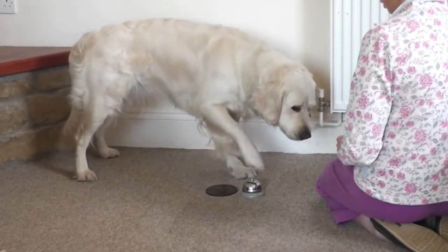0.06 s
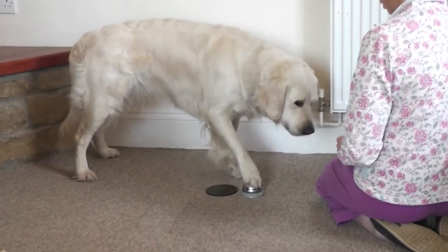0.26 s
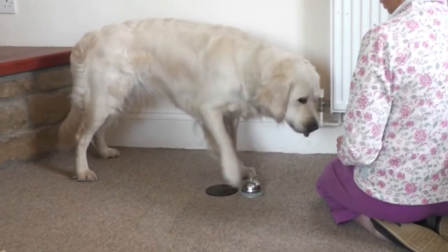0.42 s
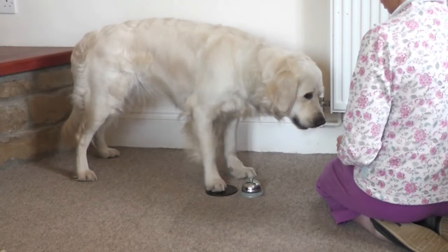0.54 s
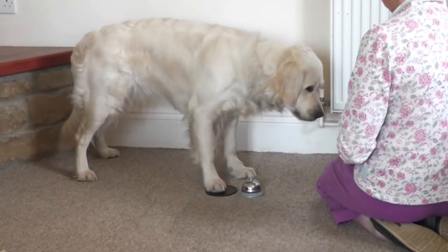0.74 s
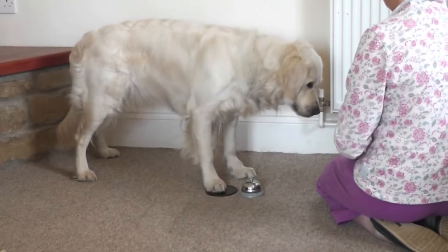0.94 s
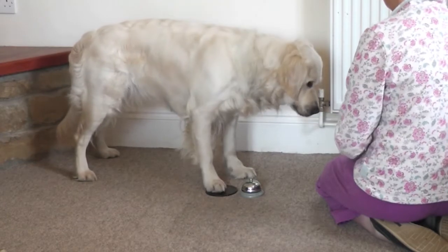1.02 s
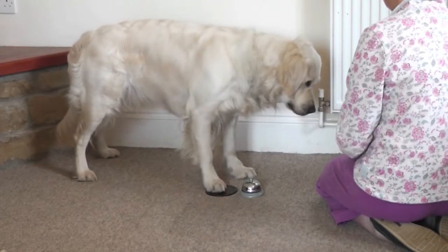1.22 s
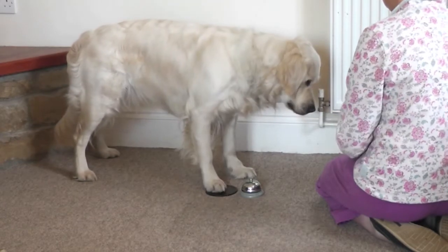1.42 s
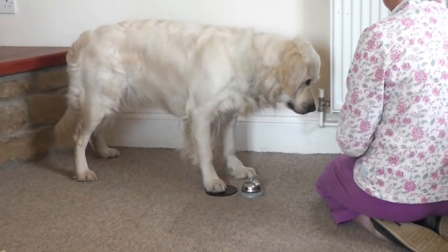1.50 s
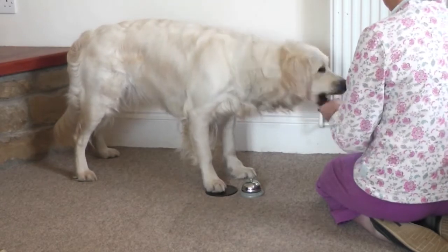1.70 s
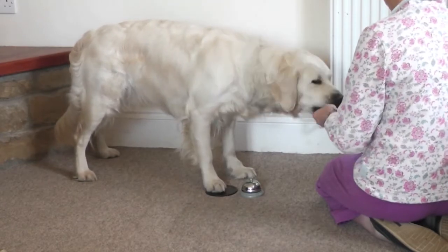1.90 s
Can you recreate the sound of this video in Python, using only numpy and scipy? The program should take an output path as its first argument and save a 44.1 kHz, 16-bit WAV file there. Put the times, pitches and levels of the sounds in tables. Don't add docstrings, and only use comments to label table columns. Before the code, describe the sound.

A small metal desk bell is dinged once by a dog's paw, then a hand clicker snaps twice

```python
import sys
import numpy as np
from scipy import signal
from scipy.io import wavfile
from scipy.ndimage import uniform_filter1d

SR = 44100
rng = np.random.default_rng(int(sys.argv[2]) if len(sys.argv) > 2 else 0)


def waveform_to_disk(signal):
    frames = np.transpose(np.atleast_2d(signal))
    scaled = np.clip(frames, -1, 1) * 32767
    samples = np.round(scaled).astype(np.int16)
    wavfile.write(sys.argv[1], SR, samples)


def to_linear_factor(level_db):
    exponent = np.asarray(level_db, float) / 20
    return 10 ** exponent


N = 85995

# pitch_hz, density_db (per Hz)
HOUSE_SPECTRUM = [(30, -12), (110, -8.5), (300, -19.5), (700, -15.5), (1500, -22), (2800, -52),
                  (4200, -33.5), (8000, -38.5), (15000, -45)]
# time_s, pitch_hz, level_db
WHINE_PATH = [
    (.04, 600, -69),
    (.1, 578, -68.5),
    (0.201, 564, -59.5),
    (.24, 555, -93),
    (0.929, 665, -80),
    (1.019, 660, -59),
    (1.199, 640, -73),
    (1.451, 600, -70.5),
    (1.632, 560, -59.5),
    (1.72, 545, -67.5),
]
# pitch_hz, t60_s, level_db
ROOM_BANDS = [(400, 0.17, -16), (1560, 0.49, 4), (4630, 0.36, 8.5), (9000, 0.29, -27), (13900, 0.17, 14.5)]
# start_s, level_db, pitch_hz, width_hz, length_s
SMALL_NOISES = [
    (0.137, -47.5, 4450, 900, 0.001),
    (.141, -53.5, 4300, 1211, 0.001),
    (0.038, -54, 1099, 499, 0.0073),
    (0.907, -61, 1280, 248, 0.071),
    (.91, -57, 487, 120, 0.034),
    (1.615, -60, 960, 900, 0.026),
    (1.623, -55, 660, 202, 0.0368),
    (1.766, -64, 10600, 4000, .008),
    (1.769, -64.5, 3860, 910, 0.032),
]
# start_s, level_db, thud_db
CLICKER_SNAPS = [
    (.4755, -4.5, -20),
    (.6865, -4, -21.5),
]
# pitch_hz, width_hz, in_db, out_db
TONGUE_MODES = [(1890, 585, -13.5, -16), (4873, 920, -5.5, -4), (6384, 730, -5.5, -2), (7305, 980, 0.5, -5),
                (8995, 1420, -2.5, -5.5), (10560, 766, -15.5, -4.5), (11100, 800, -6, -3),
                (13820, 960, -13.5, -11.5)]
# pitch_hz, t60_s, level_db
TONGUE_AFTER_RING = (9600, 0.35, -36.5)
# start_s, crack_db, thud_db
PAW_KNOCKS = [
    (0.2286, -21.5, -40.5),
    (0.231, -18.5, -19.5),
]
DOME_PITCHES = [900.0, 889.9, 2369.8, 2355.9, 4369.9, 4365.3, 6855.3, 6870.7, 9814.2, 9804.9, 13181,
                13169.5]
# level_db, t60_s, left_over_right_db, leg_near_change_db
DOME_MODES = [(-34, 8.73, 2, 3), (-47.5, 9.5, 1.9, 0), (-33, 4.43, 5, -5.5), (-43, 4.4, -2, -1),
              (-30, 4.37, -0.2, 0.9), (-42.5, 4.2, -15, 1.9), (-22.5, 1.924, -0.3, -0.9),
              (-33, 1.81, -17.5, 0), (-18.5, 0.47, -8, 2.7), (-32.5, 0.41, -23.5, 0.5), (-23, 0.37, 2, 3.7),
              (-22, 0.24, -11.5, 1.1)]
DOME_PHASES = [0, .06, 0, .15, 0, -.14, 0, -.08, 0, .24, 0, .13]
PORT_LAGS = [0.057, 0.0087, 0.051, 0.048, 0.012, -.13, -.07, .02, -0.0082, 0.13, 0.26, -0.085]
BASE_PITCHES = [3720, 6836, 8178, 11402, 11451]
# level_db, t60_s, left_over_right_db
BASE_MODES = [(-37.5, .2, -4.5), (-29, 0.16, -4), (-21.5, 0.23, -0.8), (-21.5, 0.24, -4.5),
              (-17, .13, -6.5)]
# start_s, gain_reached_db
GAIN_DUCKS = [
    (.233, -10.5),
    (.477, -6.5),
    (.688, -7.5),
]

HOUSE_DB, HUM_HZ, HUM_DB = -56.5, 114.6, -62.5
SCUFF_DB, SCUFF_END_S = -63, 0.33
ROOM_DB, KNOCK_ROOM_DB = 0.5, -3
FLUTTER_S, FLUTTER_DB = 0.012, 0.5
SNAP_S, BUCKLES = 0.007, 7
PLUNGER_S, STRIKE_S = 0.2285, 0.2315
LEG_AWAY_S, LEG_MOVE_S = 0.72, 0.13
PLUNGER_RING_DB = -16
OLD_RING_DB, OLD_RING_TILT_DB = -28.5, -9.5
OVERTONE_DB, OVERTONE_NEAR_DB = 19.5, -6
RATTLE_DB, RATTLE_S = -30, 0.051
NOTCH_HZ, NOTCH_WIDTH_HZ, NOTCH_DB = 3030, 1800, -15
DUCK_ATTACK_S, RECOVER_DB_S = 0.0012, 44.5
CEILING, TOP_HZ = 0.4, 16100


def band(x, hz, width):
    return signal.lfilter(*signal.iirpeak(min(hz, 0.45 * SR), hz / width, SR), x)


def unit(x):
    return x / np.sqrt(np.mean(x ** 2))


def pan(x, db):
    return x * to_linear_factor(np.array([[db / 2], [-db / 2]]))


def walk(rate):
    k = int(SR / rate)
    return unit(uniform_filter1d(uniform_filter1d(rng.standard_normal(N), k), k))


def decay(t, start, length):
    return (t >= start) * np.exp(-np.maximum(t - start, 0) / length)


def house(t):
    spectrum_hz, spectrum_db = np.array(HOUSE_SPECTRUM).T
    tone = 0
    for hz in 30 * 2 ** np.arange(0, 9.1, 0.5):
        mid, side = (unit(band(band(rng.standard_normal(N), hz, hz / 2.2), hz, hz / 2.2)) for _ in range(2))
        db = np.interp(np.log(hz), np.log(spectrum_hz), spectrum_db) + 10 * np.log10(hz) + 2.23 * walk(4)
        stereo = mid + np.clip(hz / 170, 0.4, 1) * side * np.array([[1], [-1]])
        tone = tone + to_linear_factor(db) * stereo * pan(1, np.clip(600 / hz - 1.5, 0, 2.5))
    hum = to_linear_factor(HUM_DB + 2.2 * walk(25)) * np.sin(2 * np.pi * HUM_HZ * t)
    brush = unit(band(rng.standard_normal((2, N)), 630, 899.4))
    scuff = brush * to_linear_factor(SCUFF_DB + 1.3 * walk(30)) * (t < SCUFF_END_S)
    return unit(tone) * to_linear_factor(HOUSE_DB) + pan(hum, 2.0) + scuff


def whine(t):
    s, hz, db = np.array(WHINE_PATH).T
    pitch = np.interp(t, s, hz) * (1 + 0.0051 * walk(24))
    level = to_linear_factor(np.interp(t, s, db, -120, -120) + 2.5 * walk(5))
    return level * np.sin(2 * np.pi * np.cumsum(pitch) / SR)


def room(x):
    t = np.arange(SR // 2) / SR
    common, own = rng.standard_normal(len(t)), rng.standard_normal((2, len(t)))
    flutter = to_linear_factor(FLUTTER_DB * np.cos(2 * np.pi * t / FLUTTER_S))
    grain = (0.8 * common + 0.6 * own) * flutter * np.clip(t / 0.0024, 0, 1)
    tail = sum(to_linear_factor(db - 60 * t / t60) * band(grain, hz, 1.16 * hz) for hz, t60, db in ROOM_BANDS)
    tail = tail / np.sqrt(np.sum(tail ** 2) / 2)
    return signal.fftconvolve(x[None], tail, axes=1)[:, :N]


def ticks(t):
    out = 0
    for s, db, hz, width, length in SMALL_NOISES:
        puff = unit(band(band(rng.standard_normal(N), hz, width), hz, width))
        out = out + to_linear_factor(db) * puff * decay(t, s, length)
    return out


def thud(t, s, db):
    return to_linear_factor(db) * decay(t, s, 0.00076) * np.sin(2 * np.pi * 420 * (t - s))


def clicker(t):
    out = 0
    for j, (s, db, thud_db) in enumerate(CLICKER_SNAPS):
        when = (np.arange(BUCKLES) + 0.7 * rng.random(BUCKLES)) / BUCKLES
        swell = 0.39 + 0.77 * np.sin(np.pi * when)
        size = swell * to_linear_factor(1.3 * rng.standard_normal(BUCKLES)) * rng.choice([-1, 1], BUCKLES)
        steps = np.zeros(N)
        steps[((s + SNAP_S * when) * SR).astype(int)] = size
        steps = steps + 0.097 * rng.standard_normal(N) * decay(t, s, SNAP_S)
        ring = 0
        for k, (hz, width, *in_out_db) in enumerate(TONGUE_MODES):
            mode = band(band(steps, hz, width), hz, 2 * width) * SR / width / 8
            ring = ring + (-1) ** k * to_linear_factor(in_out_db[j]) * mode
        out = out + to_linear_factor(db) * ring + thud(t, s + SNAP_S / 2, thud_db)
    hz, t60, db = TONGUE_AFTER_RING
    after = unit(band(rng.standard_normal(N), hz, 150))
    return out + to_linear_factor(db) * after * decay(t, CLICKER_SNAPS[-1][0], t60 / np.log(1000))


def knocks(t):
    noise = rng.standard_normal(N)
    bright = band(noise, 11000, 7400) + 0.53 * band(noise, 3000, 3000) + 0.5 * band(noise, 1400, 1200)
    out = 0
    for s, crack_db, thud_db in PAW_KNOCKS:
        out = out + to_linear_factor(crack_db) * bright * decay(t, s, 0.003) + thud(t, s, thud_db)
    return out


def bell(t):
    near = np.clip((LEG_AWAY_S - t) / LEG_MOVE_S + 0.5, 0, 1)
    age = np.maximum(t - STRIKE_S, 0)
    onset = np.where(t >= STRIKE_S, 1, to_linear_factor(PLUNGER_RING_DB) * decay(t, PLUNGER_S, 0.0023))
    out = 0
    modes = zip(DOME_PITCHES, DOME_PHASES, PORT_LAGS, DOME_MODES)
    for k, (hz, turns, lag, (db, t60, lr_db, near_db)) in enumerate(modes):
        old = (k < 6) * (t < STRIKE_S) * to_linear_factor(OLD_RING_DB + OLD_RING_TILT_DB * (k // 2))
        env = to_linear_factor(db) * (onset * to_linear_factor(-60 * age / t60 + near_db * near) + old)
        cycles = hz * (t - STRIKE_S) + turns + np.array([[lag / 2], [-lag / 2]])
        out = out + pan(env * np.sin(2 * np.pi * cycles), lr_db)
        if k == 1:
            octave = band(out ** 2, 2 * DOME_PITCHES[0], 100)
            out = out + to_linear_factor(OVERTONE_DB + OVERTONE_NEAR_DB * near) * octave
    for hz, (db, t60, lr_db) in zip(BASE_PITCHES, BASE_MODES):
        mode = onset * to_linear_factor(db - 60 * age / t60) * np.cos(2 * np.pi * hz * (t - STRIKE_S))
        out = out - pan(mode, lr_db)
    noise = rng.standard_normal((2, N)) + 0.47 * rng.standard_normal(N)
    rattle = unit(band(noise, 1327, 1400))
    return out + to_linear_factor(RATTLE_DB) * rattle * decay(t, STRIKE_S, RATTLE_S)


def scene():
    t = np.arange(N) / SR
    paw = knocks(t)
    rest = clicker(t) + ticks(t)
    echo = room(rest + to_linear_factor(KNOCK_ROOM_DB) * paw)
    return bell(t) + pan(paw + rest, -0.6) + to_linear_factor(ROOM_DB) * echo + whine(t) + house(t)


def low_pass(x):
    return signal.sosfilt(signal.butter(12, 17100, fs=SR, output="sos"), x)


def record(dry):
    t = np.arange(N) / SR
    ducks = []
    for s, reached_db in GAIN_DUCKS:
        recovery = np.minimum(reached_db + RECOVER_DB_S * (t - s), 0)
        ducks.append(recovery * np.clip((t - s) / DUCK_ATTACK_S + 0.5, 0, 1))
    gain = to_linear_factor(np.min(ducks, axis=0))
    x = dry - (1 - to_linear_factor(NOTCH_DB)) * band(dry, NOTCH_HZ, NOTCH_WIDTH_HZ)
    x = CEILING * np.tanh(x * gain / CEILING)
    x = signal.sosfilt(signal.ellip(6, 0.3, 50, TOP_HZ, fs=SR, output="sos"), x)
    return low_pass(x)


dry = scene()
out = record(dry)
waveform_to_disk(out)
```